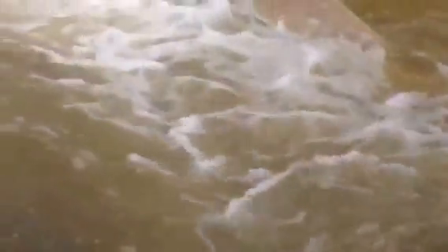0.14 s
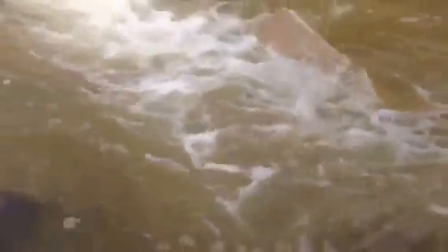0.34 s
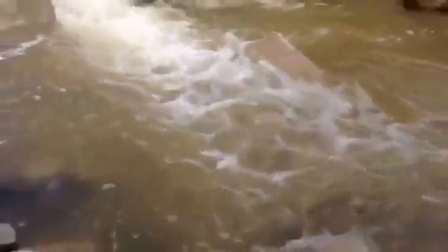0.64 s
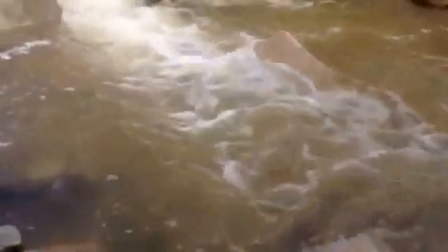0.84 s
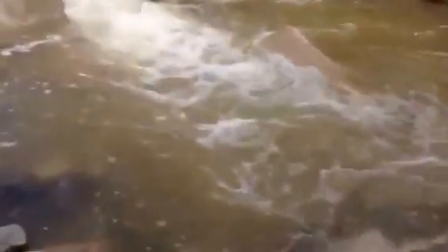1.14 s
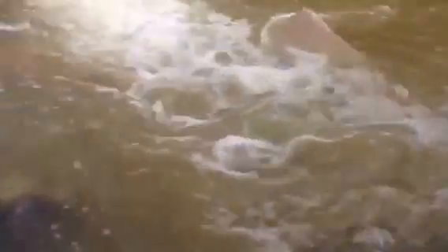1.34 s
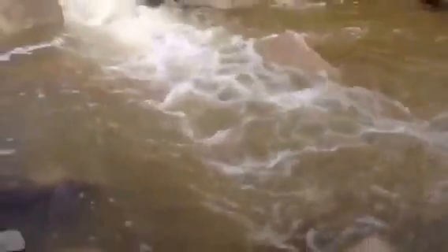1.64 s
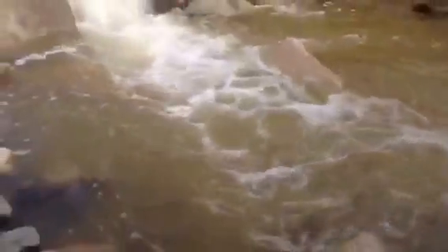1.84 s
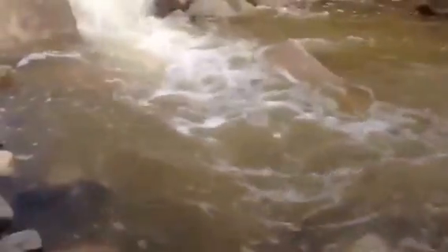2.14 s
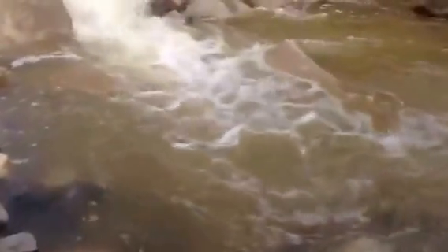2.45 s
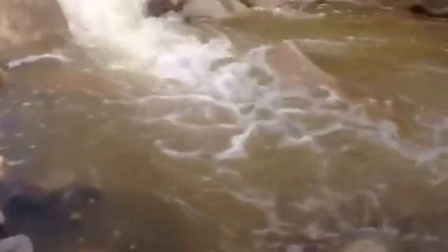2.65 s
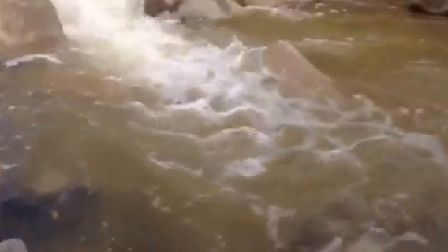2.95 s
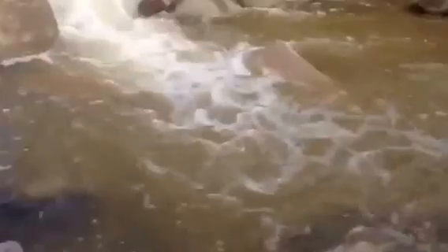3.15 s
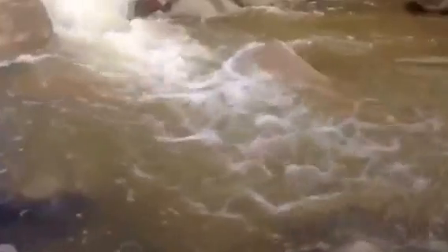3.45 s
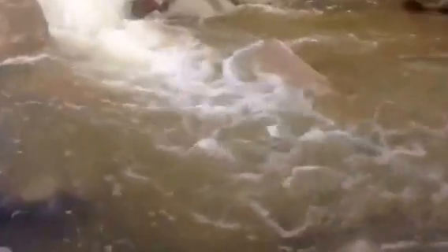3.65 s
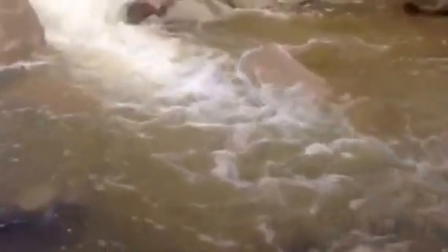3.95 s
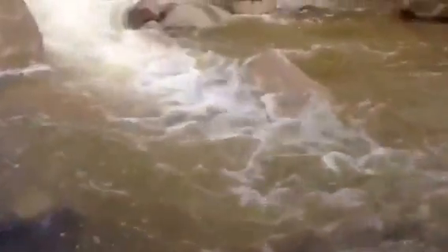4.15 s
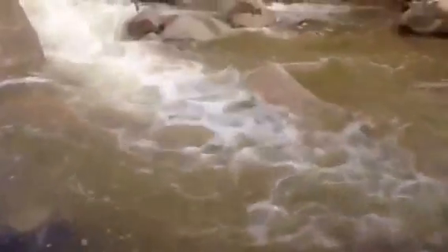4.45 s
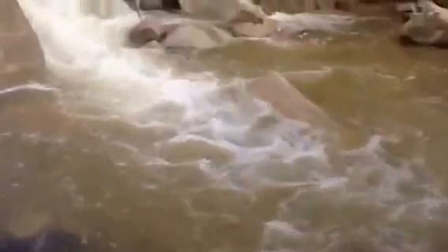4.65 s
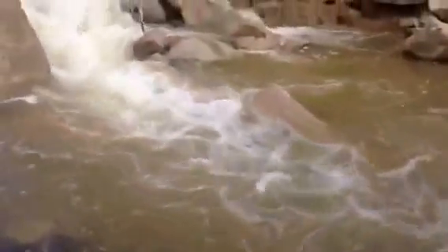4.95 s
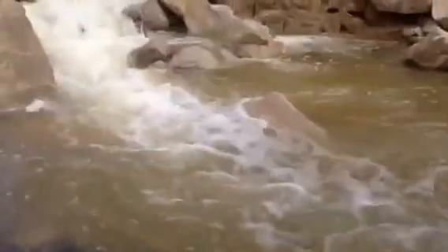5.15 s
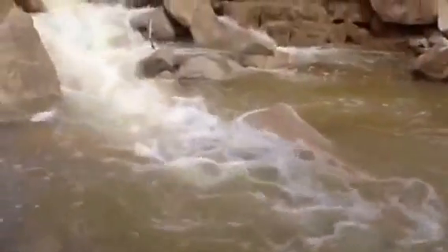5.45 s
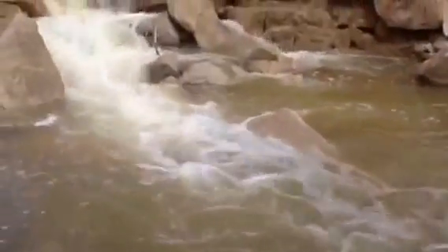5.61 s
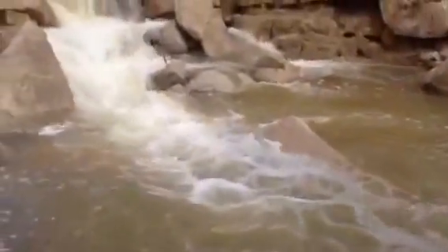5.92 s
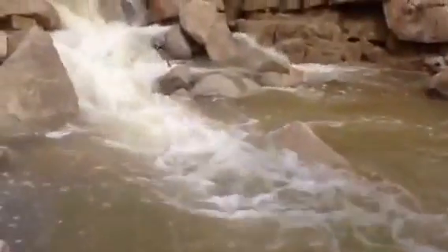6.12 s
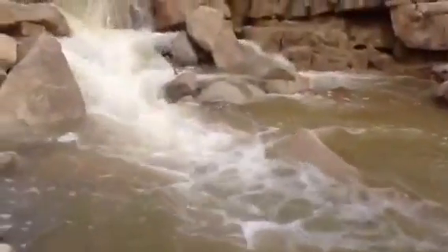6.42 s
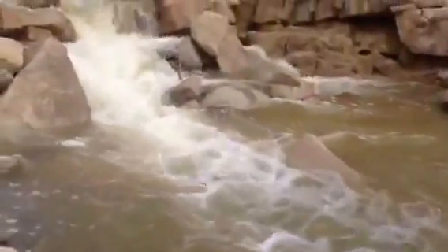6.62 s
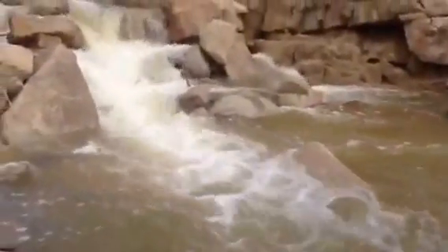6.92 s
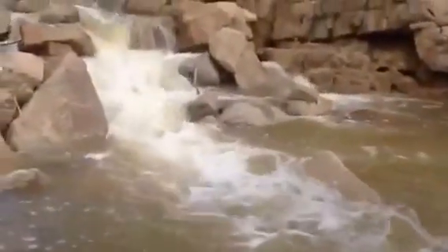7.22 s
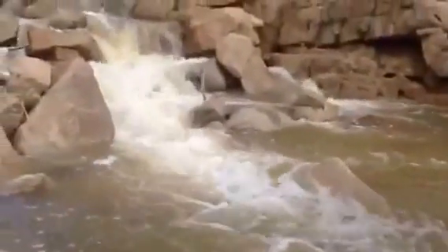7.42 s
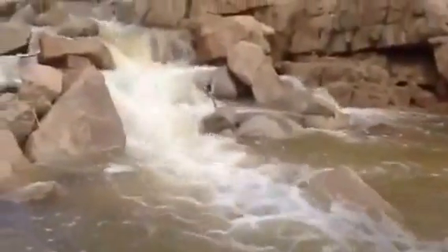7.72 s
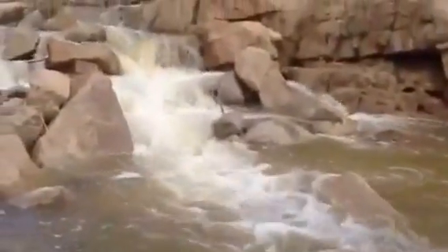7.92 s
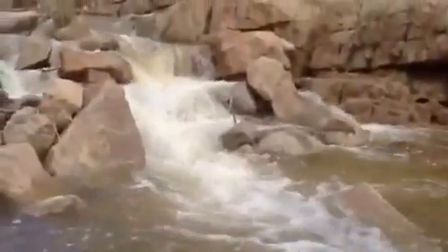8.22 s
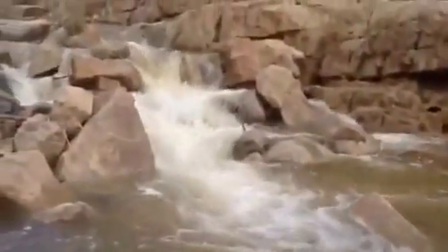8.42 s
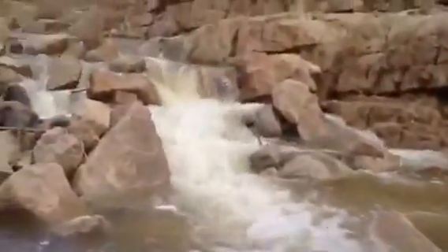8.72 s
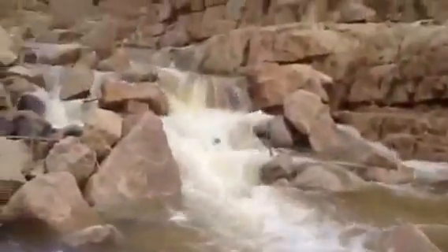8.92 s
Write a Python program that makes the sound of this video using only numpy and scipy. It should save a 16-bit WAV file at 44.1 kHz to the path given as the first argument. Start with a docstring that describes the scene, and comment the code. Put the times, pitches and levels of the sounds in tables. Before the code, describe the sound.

Muddy water rushes steadily over boulders into a pool, with a low rumble, bubbling churn, splashing spray and fizzing foam.

```python
"""Floodwater plunging between boulders

Muddy water falls into a pool, heard in mono from the bank. Trapped air resonates, lower the larger it is:
big pockets rumble and gulp, bubbles churn in the white water, drops splash and the foam fizzes.
The rocks return faint echoes, and the sound brightens as the microphone tilts up to the fall."""
import sys
import numpy as np
from scipy import signal
from scipy.fft import rfft, irfft, next_fast_len
from scipy.io import wavfile
from scipy.ndimage import map_coordinates

SR = 44100
rng = np.random.default_rng(int(sys.argv[2]) if len(sys.argv) > 2 else 0)


def wav_out(sig):
    """Save sig, one row per channel (or a flat mono array), as 16-bit PCM at SR to the path in sys.argv[1]."""
    wavfile.write(sys.argv[1], SR, np.round(np.clip(np.atleast_2d(sig).T, -1, 1) * 32767).astype(np.int16))


N = 399987

# Spectrum of the rumble. Each row: frequency in Hz, relative spectral level in dB.
PLUNGE_SPECTRUM = [(8, -61), (22, -34), (50, -23), (66, -11), (92, -11.5), (148, 0.0), (182, -0.5),
                   (225, -4.5), (300, -7.5), (375, -11), (420, -16.5), (520, -27.5), (900, -120)]

def plunge(level_db):
    """Collective oscillation: clouds of air driven under the pool by the fall throb at low pitch."""
    throb = rng.standard_normal(N) * amp(.7 * wobble(18))
    return amp(level_db + 0.5 * wobble(4)) * coloured(throb, PLUNGE_SPECTRUM)


# The biggest air pockets. Each row: start in seconds, relative level in dB, starting pitch in Hz.
AIR_POCKETS = [(.302, -15, 157), (.449, -14.5, 143), (1.329, -14, 148), (1.804, -15, 160),
               (3.131, -18, 148), (3.487, -12.5, 128), (4.31, -20, 231), (4.501, -14, 202),
               (7.517, -20, 151)]

def gulps():
    """Bubble resonance: each big pocket of air rings as a spring against the mass of the water."""
    out = np.zeros(N + SR)
    t = np.arange(SR // 5) / SR
    for start, db, hz in AIR_POCKETS:
        out[round(start * SR):][:len(t)] += amp(db - 7.5) * ring(t, hz, cycles=9.8, rise=0.055)
    return out[:N]


# Spectrum of the white water. Each row: frequency in Hz, relative spectral level in dB.
CHURN_SPECTRUM = [(200, -67), (440, -10), (495, -0.5), (560, -1), (760, 1), (880, -0.1), (1020, -4),
                  (1250, -5.5), (1550, -5.5), (2100, -7.5), (2600, -9.5), (3100, -22), (6000, -120)]
# Its slow swelling and slackening. Each row: time in seconds, mean level in dB.
CHURN_SWELL = [(0, -36.7), (2.0, -36), (3.8, -37), (6.1, -36), (8.1, -36.5), (9.07, -38.5)]

def churn(surge_db):
    """Incoherent summation: countless far bubbles merge into a rush, and nearer ones babble over it."""
    level_db = curve(CHURN_SWELL) + surge_db
    near = bubbles(count=3600, low_hz=600, high_hz=2800, cycles=42, spread_db=0.7, samples=2200)
    water = patchy(rng.standard_normal(N) + amp(-14) * near, depth_db=1.4, width_hz=55, life_s=.02)
    return amp(level_db + .15 * wobble(21)) * coloured(water, CHURN_SPECTRUM)


# Spectrum of the spray. Each row: frequency in Hz, relative spectral level in dB.
SPLASH_SPECTRUM = [(1200, -58), (2500, -11.5), (2950, -4), (3450, -1.5), (3900, -1.5), (4250, -4),
                   (5100, -3.5), (5700, -8), (6600, -13), (12000, -120)]

def splash(level_db):
    """Impact noise: thrown drops slap the rocks and the pool in quick flurries."""
    drops = bubbles(count=6000, low_hz=2393, high_hz=6490, cycles=31, spread_db=2.0, samples=650)
    water = patchy(rng.standard_normal(N) + amp(-14.5) * drops, depth_db=1.5, width_hz=80, life_s=.02)
    return amp(level_db + 0.34 * wobble(26)) * coloured(water, SPLASH_SPECTRUM)


# Spectrum of the foam. Each row: frequency in Hz, relative spectral level in dB.
FIZZ_SPECTRUM = [(2500, -58), (5200, -15), (6100, -3), (6600, -2.5), (7000, -1.4), (7700, -1), (9000, -5),
                 (10200, -6.5), (10700, -16), (12000, -49)]

def fizz(level_db):
    """Small cavities resonate high: tiny bubbles bursting all over the foam blend into a hiss."""
    bursts = bubbles(count=7000, low_hz=5400, high_hz=11000, cycles=18, spread_db=3.5, samples=220)
    foam = patchy(rng.standard_normal(N) + amp(-15) * bursts, depth_db=2.0, width_hz=80, life_s=.02)
    return amp(level_db + 0.34 * wobble(26)) * coloured(foam, FIZZ_SPECTRUM)


def boulder_echoes(x, count, echo_db, drift_s):
    """Reflection: rock faces return weak copies, whose delays drift as the microphone sways."""
    echoes = np.zeros(N)
    for delay_s in rng.uniform(.003, .022, count):
        lag = (SR * (delay_s + drift_s * wobble(.5))).astype(int)
        echoes += x[np.clip(np.arange(N) - lag, 0, N - 1)]
    return amp(echo_db) * echoes


def ring(t, hz, cycles, rise):
    """Damped oscillation: a bubble swells, dies away and rises in pitch as it nears the surface."""
    age = t * hz / cycles
    envelope = (1 - np.exp(-2 * t * hz)) * np.exp(-np.log(30) * age)
    return envelope * np.sin(2 * np.pi * hz * t * (1 + rise * age / 2))


def bubbles(count, low_hz, high_hz, cycles, spread_db, samples):
    """Shot noise: bubbles of random time, pitch, strength and life add up to a swarm at rms 1."""
    when, pitch, strength, life = rng.random((count, 4)).T[:, :, None]
    hz = low_hz * (high_hz / low_hz) ** pitch
    gain = amp(-spread_db * np.log(strength + .01)) * hz / low_hz  # few are strong; equal power per Hz
    waves = gain * ring(np.arange(samples) / SR, hz, cycles * (.5 + life), rise=.15)
    at = (when * N).astype(int) + np.arange(samples)
    return unit(np.bincount(at.ravel(), waves.ravel(), N)[:N])


def patchy(x, depth_db, width_hz, life_s):
    """Amplitude modulation: narrow bands swell and fade as clouds of like-sized bubbles come and go."""
    hz, t, spectra = signal.stft(x, SR, nperseg=1024)
    place = np.meshgrid(hz / width_hz, t / life_s, indexing="ij")
    patches = map_coordinates(rng.standard_normal((400, 800)), place, order=1, mode="wrap")
    return signal.istft(spectra * amp(depth_db * unit(patches)), SR, nperseg=1024)[1][:N]


def coloured(x, spectrum):
    """Spectral shaping: x follows (Hz, dB) points on a log frequency axis, at rms 1."""
    points_hz, db = np.transpose(spectrum)
    return unit(filtered(x, lambda hz: amp(np.interp(np.log(hz + 1), np.log(points_hz), db))))


def filtered(x, response):
    """Linear filtering: the spectrum of x is multiplied by a frequency response."""
    size = next_fast_len(N + SR // 4)
    return irfft(rfft(x, size) * response(np.fft.rfftfreq(size, 1 / SR)), size)[:N]


def wobble(rate):
    """Random fluctuation: a smooth curve through rate knots a second."""
    knots = rng.standard_normal(1024)
    return map_coordinates(knots, [np.arange(N) * rate / SR], mode="wrap")


def curve(rows):
    """Linear interpolation: (seconds, value) rows give one value per sample."""
    return np.interp(np.arange(N) / SR, *np.transpose(rows))


def amp(db):
    """The decibel scale: a level becomes an amplitude ratio."""
    return 10 ** (np.asarray(db) / 20)


def unit(x):
    """Normalisation: x scaled to rms 1."""
    return x / np.sqrt(np.mean(x ** 2) + 1e-20)


# The microphone's tilt. Each row: time in seconds, aim from 0 at the pool to 1 at the fall.
MICROPHONE_AIM = [(4.0, 0), (7.5, 0.94)]

def scene():
    """Superposition: the layers add, with less rumble and more spray as the aim nears the fall."""
    aim = curve(MICROPHONE_AIM)
    surge_db = 0.41 * wobble(30)  # each slop of water lifts all the bright sounds together
    surface = (churn(.5 * surge_db)
               + splash(level_db=-42.5 + 0.15 * aim + surge_db)
               + fizz(level_db=-46.5 + 1.04 * aim + surge_db))
    rumble = plunge(level_db=-33.5 - 1.23 * aim) + gulps()
    # the long waves of the rumble diffract round the rocks; only the short ones reflect
    water = rumble + surface + boulder_echoes(surface, count=6, echo_db=-23.5, drift_s=.00015)
    return np.array([water, water])


def record(dry):
    """Band limiting: a sharp low-pass filter removes the highest treble."""
    cutoff_hz = 10750
    return np.array([filtered(channel, lambda hz: hz < cutoff_hz) for channel in dry])


dry = scene()
out = record(dry)
wav_out(out)
```